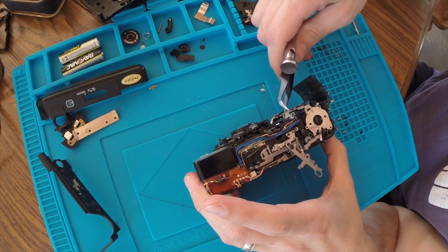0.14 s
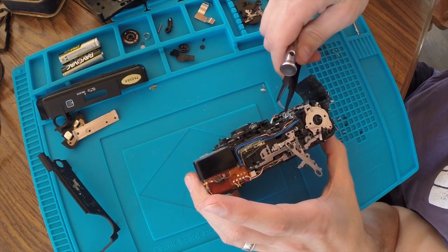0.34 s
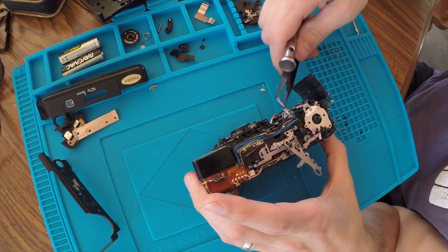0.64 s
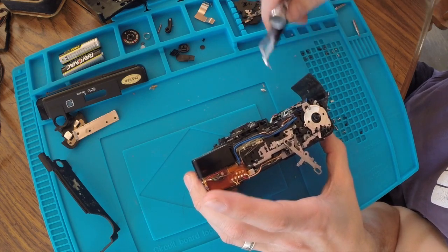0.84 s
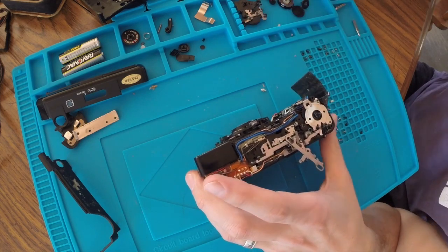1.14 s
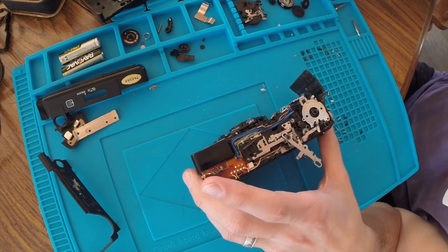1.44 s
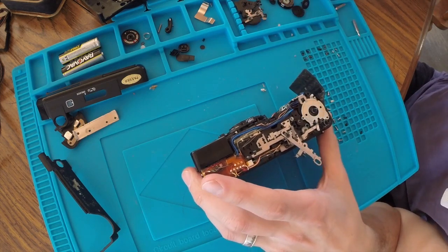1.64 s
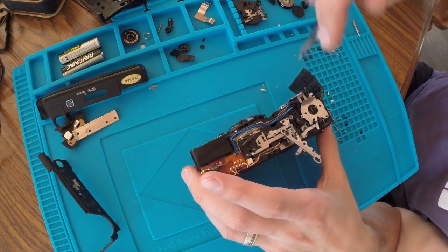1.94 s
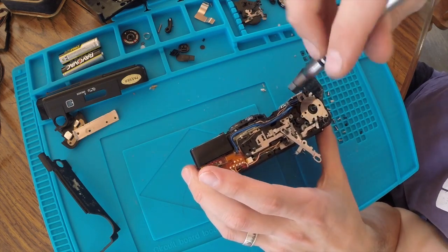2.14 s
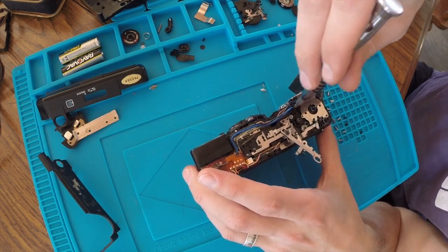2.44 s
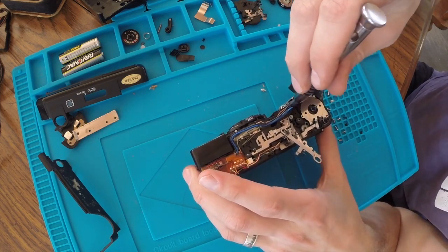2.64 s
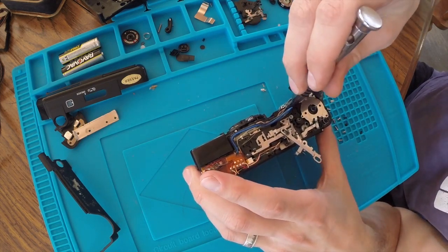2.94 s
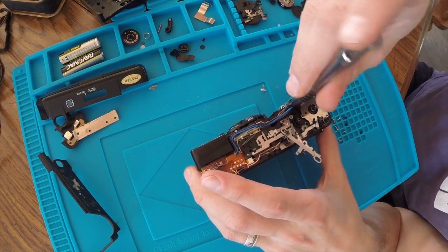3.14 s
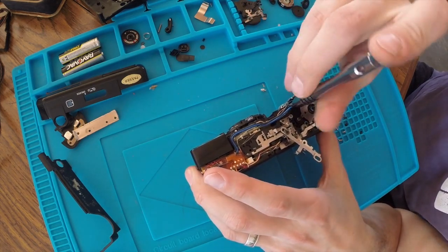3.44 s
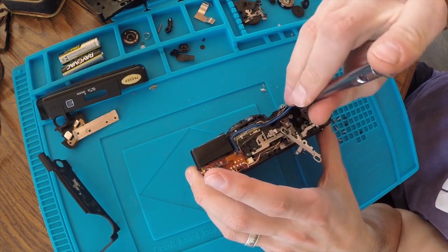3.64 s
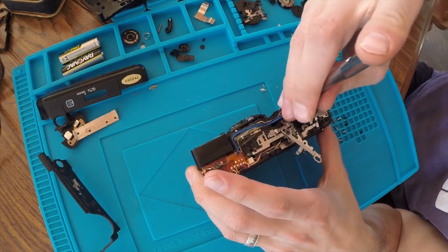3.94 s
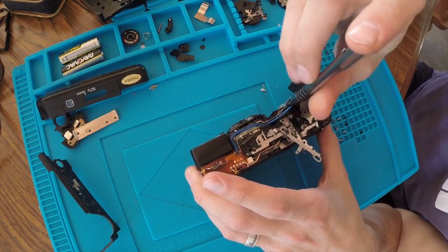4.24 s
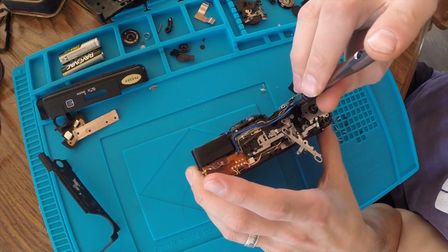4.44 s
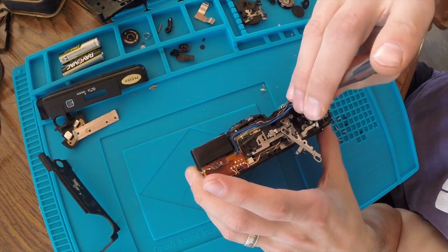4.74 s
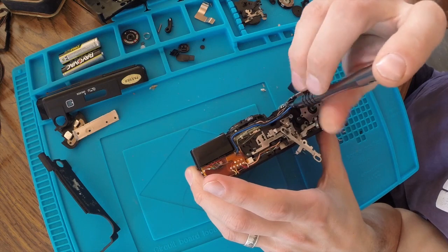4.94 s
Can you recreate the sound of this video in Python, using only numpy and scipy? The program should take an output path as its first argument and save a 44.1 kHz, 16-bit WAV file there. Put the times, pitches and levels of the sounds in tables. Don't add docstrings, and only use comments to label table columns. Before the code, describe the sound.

Small steel tools tap and tick on a hollow camera body in a quiet room, with four short knocks, two of them extremely loud.

```python
import sys
import numpy as np
from scipy import signal
from scipy.fft import irfft
from scipy.io import wavfile
from scipy.ndimage import uniform_filter1d

SR = 44100
rng = np.random.default_rng(int(sys.argv[2]) if len(sys.argv) > 2 else 0)


def invert_db(level):
    return 10 ** (np.asarray(level, dtype=float) / 20)


def unload_wav(signal):
    wavfile.write(
        sys.argv[1],
        SR,
        np.round(np.clip(np.atleast_2d(signal).T, -1, 1) * 32767).astype(np.int16),
    )


N = 224733


def evened(x):
    return x / np.sqrt(np.mean(x ** 2) + 1e-20)


def read(points, hz):
    f, value = np.transpose(points)
    return np.interp(np.log(hz + 1), np.log(f + 1), value)


def band(hz, width):
    r = np.exp(-np.pi * width / SR)
    zeros, poles = [1, 0, -1], [1, -2 * r * np.cos(2 * np.pi * hz / SR), r * r]
    once = signal.lfilter(zeros, poles, rng.standard_normal(N))
    return evened(signal.lfilter(zeros, poles, once))


def stroke(modes, rough_db):
    unevenness = uniform_filter1d(uniform_filter1d(rng.standard_normal(N), 100), 100)
    grip = invert_db(rough_db * evened(unevenness))
    return evened(grip * sum(invert_db(db) * band(hz, width) for hz, width, db in modes))


def pressure(rows, swell, fade):
    t = np.arange(N) / SR
    gain = np.zeros(N)
    for s, hold, db in rows:
        gain += invert_db(db - swell * np.maximum(s - t, 0) - fade * np.maximum(t - s - hold, 0))
    return gain


def add_ring(mix, s, db, hz, t60, rise, glide=0):
    start, decay = int((s - 3 * rise) * SR), np.log(1000) / t60
    t = (start + np.arange(9000)) / SR - s
    release = decay * rise ** 2
    bell = -.5 * (np.minimum(t, release) / rise) ** 2
    shape = np.exp(bell - decay * np.maximum(t - release, 0))
    touch = np.clip(t / rise + 3, 0, 1) ** 2
    turns = hz * (t + glide * np.minimum(t, 0) ** 2 / rise)
    part = mix[start:start + len(t)]
    part += (invert_db(db) * touch * shape * np.sin(2 * np.pi * turns))[:len(part)]


# (frequency [Hz], level per Hz [dB])
AIR_COLOUR = [(18, -56.5), (30, -24), (186, 0.5), (298, 1), (543, -2), (939, -1.5), (1350, -4), (2530, -5),
              (4370, -13), (4860, -16), (5830, -18.5), (8850, -26), (10100, -30.5), (11500, -33),
              (15300, -30)]
# (frequency [Hz], depth [dB])
PATCH_DEPTH = [(60, 1.5), (250, 3.5), (700, 5), (1500, 2.5), (5000, 3), (10000, 4), (14000, 5)]
# (time [s], level [dB])
STIR_SWELL = [(0, -2), (.4, 1.5), (.85, -2.5), (1.28, 3.5), (1.42, 2.5), (1.54, 6), (1.88, -1), (2.1, 2),
              (2.3, 2), (2.55, -0.5), (2.95, -2), (3.27, -2), (3.7, -1), (4.08, 2), (4.2, 0), (4.62, 1.5),
              (5.1, 1)]


def air():
    air_db, rustle_share = -56.5, .3
    frames, hz = N // 256 + 5, np.fft.rfftfreq(1024, 1 / SR)
    a, b, patches = rng.standard_normal((frames, 513, 3)).T
    patches = evened(uniform_filter1d(uniform_filter1d(patches, 12, 0), 7, 1))
    flicker = evened(uniform_filter1d(a[0], 6))
    patches = evened(patches + 0.44 * flicker)
    t = np.arange(frames) * 256 / SR
    low = np.clip(np.log(2000 / (hz + 1)), 0, 1)[:, None]
    high = (1 - low) * np.clip(np.log(11000 / (hz + 1)), 0, 1)[:, None]
    swell_db = (low + rustle_share * high) * np.interp(t, *np.transpose(STIR_SWELL))
    colour_db = read(AIR_COLOUR, hz)[:, None] + read(PATCH_DEPTH, hz)[:, None] * patches
    z = (a + 1j * b) * invert_db(colour_db)
    scale = invert_db(air_db) / np.std(signal.istft(z, nperseg=1024, noverlap=768)[1])
    return scale * signal.istft(z * invert_db(swell_db), nperseg=1024, noverlap=768)[1][:N]


# (multiple of the pitch [1], level [dB])
WHINE_PARTIALS = [(1, -73.5), (2, -72), (3, -86)]
# (time of the top [s], level [dB])
BUSY_BURSTS = [(.08, -71), (.2, -76), (.48, -74), (.63, -73), (.74, -70), (.9, -75), (1.01, -72),
               (1.26, -67), (1.54, -68), (1.69, -71), (1.785, -63.5), (1.99, -71), (2.14, -74), (2.26, -72),
               (2.53, -77), (2.789, -67.5), (2.98, -79), (3.04, -74), (3.25, -70), (4.35, -83), (4.72, -82),
               (4.77, -74), (4.899, -70.5), (4.999, -72.5)]


def whine():
    frame_rate = 60000 / 1001
    on, off = .17, 0.93
    whine_hz, clock_hz, clock_db = 4907, 13906.1, -82
    idle_db, burst_slope = -86.5, 650
    frames = np.arange(N) / SR * frame_rate
    index, place = frames.astype(int), frames % 1
    gate = uniform_filter1d(1. * (place > on) * (place < off), 30)
    shift, strength = rng.standard_normal((N // 700 + 2, 2))[index].T
    waver = 0.0077 * shift + 0.012 * evened(uniform_filter1d(rng.standard_normal(N), 90))
    turns = np.cumsum(whine_hz * (1 + waver)) / SR
    tone = sum(invert_db(db) * np.sin(2 * np.pi * k * turns) for k, db in WHINE_PARTIALS)
    awake = index % 15 != 8
    sag_db = 2.7 * strength - 3.6 * place
    song = np.sqrt(2) * tone * awake * invert_db(sag_db - 0.5)
    clock = invert_db(clock_db) * np.sin(2 * np.pi * clock_hz * np.arange(N) / SR)
    bursts = pressure([(s, 0, db) for s, db in BUSY_BURSTS], burst_slope, burst_slope)
    hiss = (invert_db(idle_db) + bursts) * band(10450, 790)
    return gate * (song + clock) + hiss * (.5 + .6 * gate)


# (frequency [Hz], decay t60 [s])
ROOM_DECAY = [(200, 0.18), (700, 0.11), (1000, 0.12), (1400, 0.15), (2200, 0.17), (3500, 0.097),
              (8000, 0.063)]


def room(x):
    room_db, build_s = -16.5, .005
    taps = np.zeros(SR // 2)
    at = np.arange(300, len(taps) - 20, 20)
    taps[at + rng.integers(0, 20, len(at))] = rng.choice([-1., 1.], len(at))
    hz, t, z = signal.stft(taps, SR, nperseg=256)
    tail = signal.istft(z * invert_db(-60 * t / read(ROOM_DECAY, hz)[:, None]), SR, nperseg=256)[1]
    tail *= 1 - np.exp(-np.arange(len(tail)) / SR / build_s)
    tail *= invert_db(room_db) / np.linalg.norm(tail)
    return signal.fftconvolve(x, tail)[:N]


# (frequency [Hz], width [Hz], level [dB])
MAT_MODES = [(277, 100, 2), (600, 310, 8.5), (950, 200, 4), (1390, 690, 7.5), (2260, 160, 0),
             (3200, 390, -10)]
# (time of full pressure [s], hold [s], level [dB])
SLIDES = [(1.512, 0.031, -37)]


def slide():
    return pressure(SLIDES, swell=800, fade=450) * stroke(MAT_MODES, rough_db=5.5)


# (time of full pressure [s], hold [s], level [dB])
FINGER_RUBS = [(1.19, 0.0061, -59), (1.285, .035, -56), (3.152, 0.038, -43.5), (3.45, 0.0095, -50),
               (3.546, 0.003, -47), (4.114, .02, -50.5), (4.19, .012, -52), (4.3, 0.031, -48.5)]


def finger_rubs():
    shell = stroke([(761, 330, 0), (1050, 300, -1)], rough_db=2.5)
    return invert_db(-5) * pressure(FINGER_RUBS, swell=710, fade=380) * shell


# (time [s], level [dB], frequency [Hz], t60 [s])
TOOL_CHINKS = [(1.542, -61, 8630, .17), (1.543, -62, 12400, .06), (1.544, -52, 4760, .03),
               (1.544, -52, 5496, .016), (1.688, -51, 6400, .012), (1.688, -57, 8600, .015),
               (1.688, -52, 11000, .02), (1.688, -52, 11670, .02), (1.769, -58, 6800, 0.018),
               (1.769, -55, 10800, 0.016), (.875, -74, 12100, .043)]


def chinks():
    out = np.zeros(N)
    for row in TOOL_CHINKS:
        add_ring(out, *row, rise=.0006)
    return out


# (time [s], level [dB], frequency [Hz])
TIP_TICKS = [(1.4373, -48, 3000), (1.924, -55, 3830), (2.018, -50, 3670), (2.1503, -33, 3740),
             (2.2918, -45, 3910), (2.7282, -55, 2950), (3.1752, -49, 3340), (3.2924, -46.5, 2060),
             (4.3031, -52, 2100)]


def ticks():
    out = np.zeros(N)
    for s, db, hz in TIP_TICKS:
        add_ring(out, s, db, hz, t60=45 / hz, rise=.0005)
    return out


# (time [s], level [dB], frequency [Hz], t60 [s])
MAT_BUMPS = [(1.489, -42, 780, .015), (1.504, -40, 800, .022), (1.509, -28, 1420, .03),
             (1.510, -27, 2270, .03), (1.519, -31, 1400, .03), (1.519, -34, 2200, .02),
             (1.518, -32, 600, .027), (1.526, -35, 810, .022), (1.533, -35, 480, .02),
             (1.546, -38, 700, .02), (1.538, -22, 1340, .07), (1.539, -28, 1460, .03),
             (1.537, -33, 2200, .03), (1.557, -32, 1370, .03), (1.578, -42, 1450, .02)]


def bumps():
    out = np.zeros(N)
    for row in MAT_BUMPS:
        add_ring(out, *row, rise=.0007)
    return out


# (time of first contact [s], level [dB], frequency [Hz])
LIGHT_TAPS = [(.445, -51, 505), (.526, -48.5, 778), (.536, -50, 705), (1.181, -42.5, 860),
              (1.191, -48, 900), (1.28, -51.5, 770), (1.291, -46, 880), (3.122, -50, 901),
              (3.143, -43, 1000), (3.157, -36.5, 1000), (3.176, -34, 910), (3.182, -36.5, 876),
              (3.196, -43, 953), (3.268, -48, 737), (3.292, -43, 1000), (3.349, -48, 780),
              (3.354, -47, 812), (3.453, -47, 917), (3.544, -39.5, 716), (3.633, -46, 652),
              (3.714, -43, 805), (3.843, -47, 795), (4.002, -37.5, 1070), (4.114, -38, 620),
              (4.118, -41, 950), (4.182, -43.5, 763), (4.192, -43, 620), (4.302, -36.5, 618),
              (4.317, -46, 750), (4.333, -44, 976)]


def light_taps():
    t60, rise, partner_db = .019, .0009, -8
    out = np.zeros(N)
    for s, db, hz in LIGHT_TAPS:
        crest = s + 2 * rise
        add_ring(out, crest, db, hz, t60, rise)
        add_ring(out, crest, db + partner_db, 1650 - hz, t60, rise)
    return out


# (time [s], level [dB], frequency [Hz])
LOOSE_RATTLES = [(1.3365, -26, 1490), (1.3352, -31.5, 3250), (1.336, -18, 790), (1.347, -25, 1440),
                 (1.355, -34, 880), (1.35, -43, 244), (2.7885, -19, 1000), (2.796, -20, 1030),
                 (2.811, -40, 2160), (2.822, -39.5, 2180), (2.803, -19, 890), (2.815, -21, 1040),
                 (2.822, -24, 908), (2.836, -26, 1020), (2.9125, -28, 960), (2.913, -38, 740),
                 (2.931, -42, 980), (3.967, -30, 1054), (3.972, -34, 1050), (3.98, -33, 850),
                 (3.985, -38, 1000), (4.8973, -11, 970), (4.9025, -18, 1030), (4.913, -21, 1040),
                 (4.9165, -22, 1060), (4.915, -38, 600)]


def rattles():
    out = np.zeros(N)
    for s, db, hz in LOOSE_RATTLES:
        late = min(abs(s - knock[0]) for knock in HARD_KNOCKS)
        add_ring(out, s, db, hz, t60=.013 + .6 * min(late, .04), rise=.0015)
    return out


# (time of the crest [s], level [dB], rise [s], longest t60 [s], upward glide [1])
HARD_KNOCKS = [
    (1.3308, -4.5, .0015, .022, 0),
    (2.784, 2.8, .0013, .029, .02),
    (3.9558, -12, .0013, .022, .02),
    (4.8908, 1.5, .0014, .021, .06),
]
# (frequency [Hz], level [dB], t60 [s], lead on the crest [s])
KNOCK_MODES = [
    [(780, 0, 0.0095, 0), (1000, -10, 0.012, -0.0079), (596, -18, 0.034, -0.0092), (1483, -6, 0.028, .0005),
     (1230, -25.5, 0.013, 0), (1612, -16, 0.017, -.001), (1870, -39, .01, 0.004), (2270, -20.5, 0.011, 0),
     (2600, -34, 0.0083, 0.0092), (3095, -17, 0.015, -0.000086), (4690, -33.5, .012, .0005),
     (5600, -49, .012, 0)],
    [(951, 4, 0.022, 0), (720, -25.5, 0.0121, -0.0035), (1240, -20, .015, -0.0095),
     (1460, -37, 0.005, -0.021), (2090, -21.5, 0.024, -.002), (2330, -27.5, 0.0052, 0.0063),
     (3360, -24.5, .008, 0.019), (3470, -27, 0.0059, -0.015), (4700, -44.5, .01, 0.0037)],
    [(1000, 1.5, 0.013, 0), (820, -29, 0.017, 0.0043), (3280, -21, 0.016, 0.00028),
     (3370, -18, 0.0099, 0.0024), (4500, -15.5, 0.009, .003), (6700, -48, 0.0091, 0.0031)],
    [(959, 2.5, 0.0075, 0), (576, -22.5, 0.009, 0.0073), (378, -41.5, 0.027, 0),
     (1272, -38.5, 0.026, 0.0088)],
]
KNOCK_SCUFFS = [-42.5, -30.5, -52, -40]


def knocks():
    max_lead = .0016
    sharpen = 0.2
    out, t, grit = np.zeros(N), np.arange(N) / SR, band(1900, 2200)
    for knock, modes, scuff_db in zip(HARD_KNOCKS, KNOCK_MODES, KNOCK_SCUFFS):
        s, db, rise, longest, glide = knock
        out += invert_db(scuff_db) * grit * np.exp(-.5 * ((t - s) / rise) ** 2)
        for hz, mode_db, t60, lead in modes:
            crest = s - np.clip(lead, -max_lead, max_lead)
            mode_rise = rise * min(1000 / hz, 1) ** sharpen
            mode_glide = glide * (hz < 1100)
            add_ring(out, crest, db + mode_db, hz, min(t60, longest), mode_rise, mode_glide)
    return out


def scene():
    rubbed = slide() + finger_rubs()
    small = chinks() + ticks() + bumps() + light_taps()
    struck = rubbed + small + rattles() + knocks()
    return (struck + room(struck) + air())[None]


def band_limit(x):
    return signal.sosfilt(signal.butter(12, 16310, fs=SR, output="sos"), x)


# (frequency [Hz], level [dB])
INPUT_RESPONSE = [(10, -17.5), (40, -5.5), (80, -2.5), (11000, 0), (11700, -0.5), (12200, 0.5),
                  (13400, 1.5), (13650, -9.5), (14100, -6.5), (14480, -16), (14700, -1), (15150, -5.5),
                  (15300, -48.5), (22050, -62.5)]


def record(dry):
    hz = np.fft.rfftfreq(2048, 1 / SR)
    taps = np.roll(irfft(invert_db(read(INPUT_RESPONSE, hz))), 1024) * np.hanning(2048)
    heard = signal.oaconvolve(dry + whine(), taps[None], "same")
    return band_limit(np.clip(heard, -.995, .995))


dry = scene()
out = record(dry)
unload_wav(out)
```